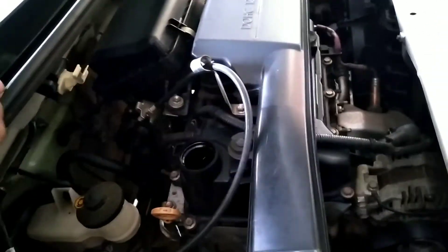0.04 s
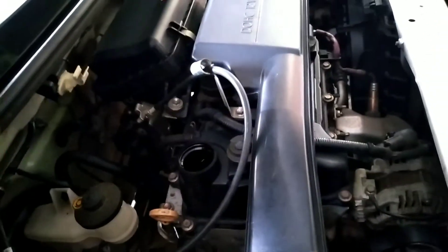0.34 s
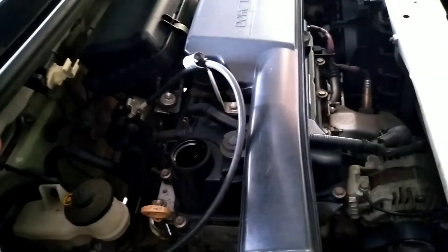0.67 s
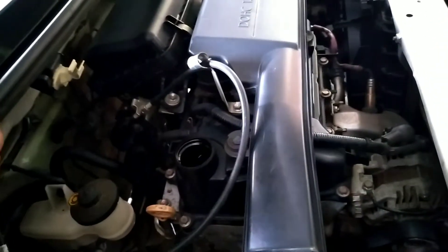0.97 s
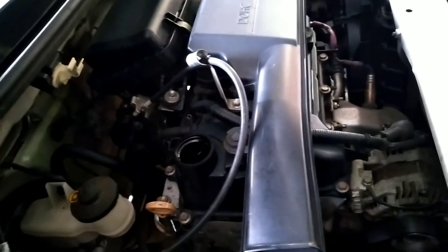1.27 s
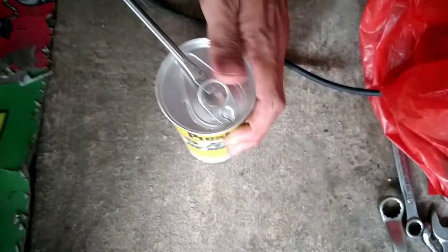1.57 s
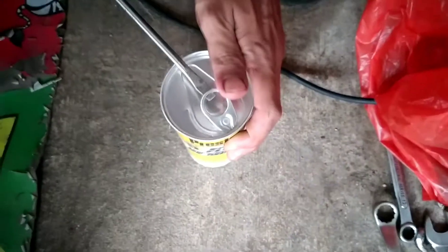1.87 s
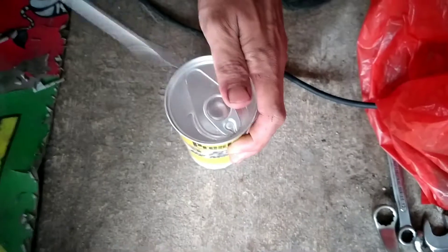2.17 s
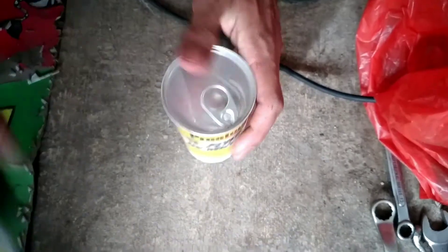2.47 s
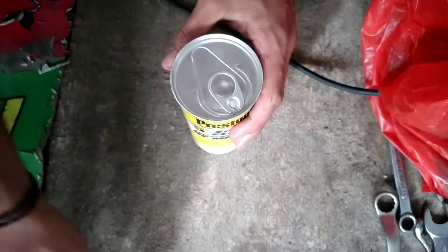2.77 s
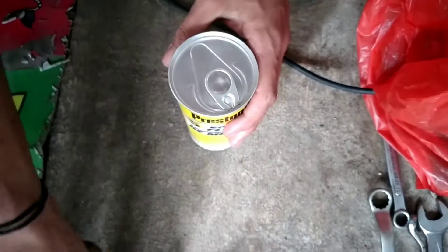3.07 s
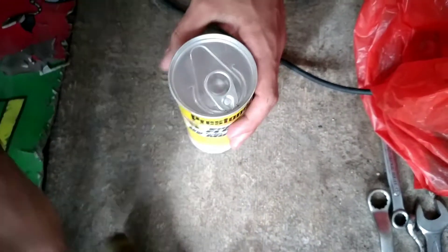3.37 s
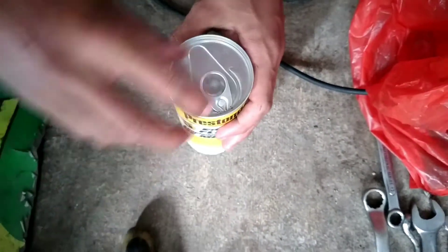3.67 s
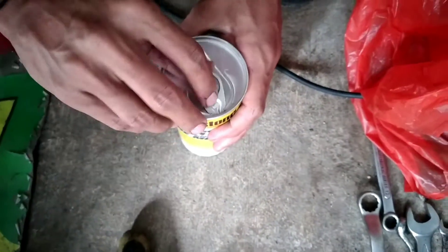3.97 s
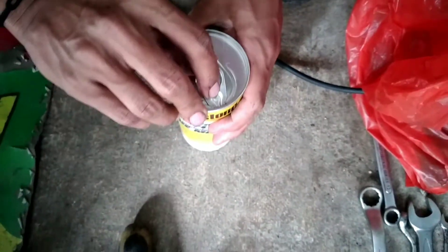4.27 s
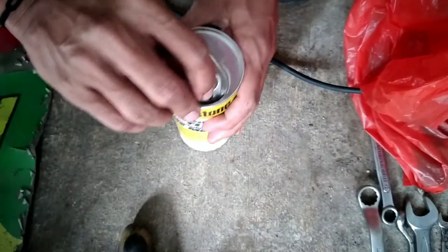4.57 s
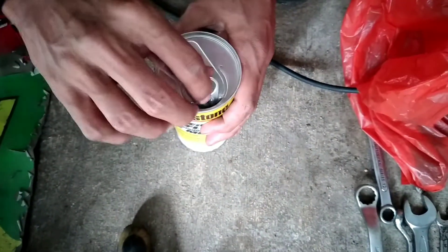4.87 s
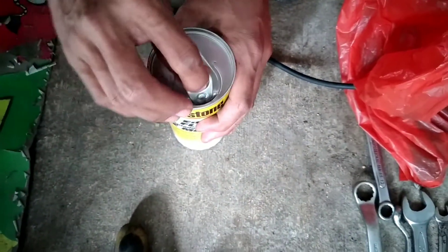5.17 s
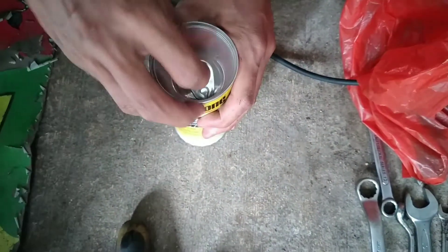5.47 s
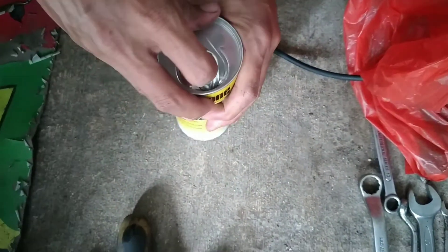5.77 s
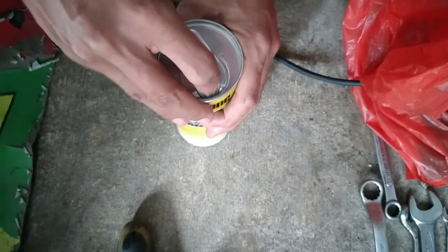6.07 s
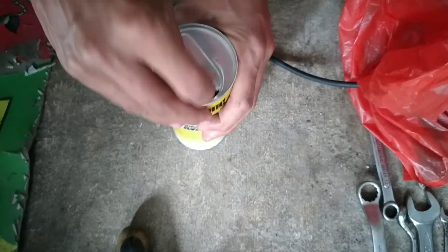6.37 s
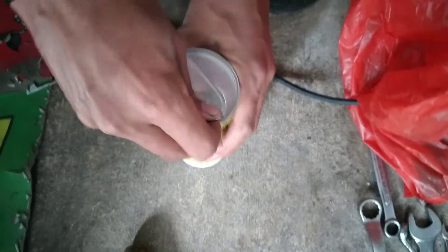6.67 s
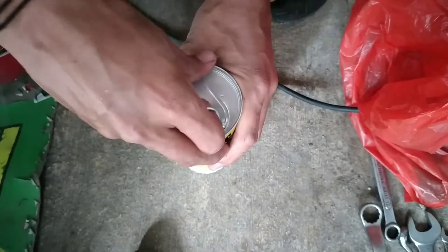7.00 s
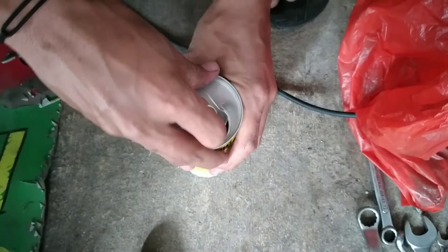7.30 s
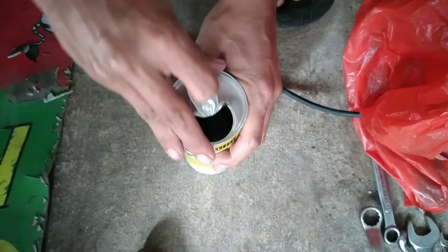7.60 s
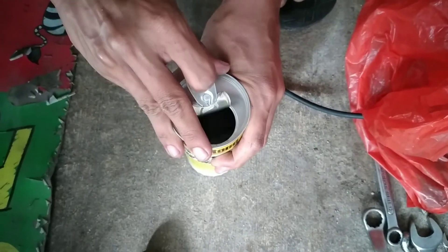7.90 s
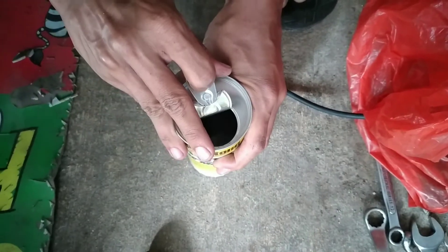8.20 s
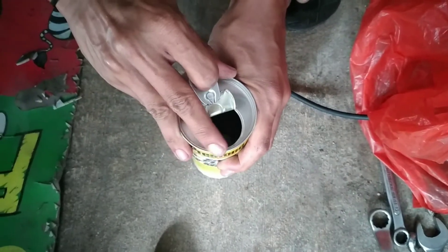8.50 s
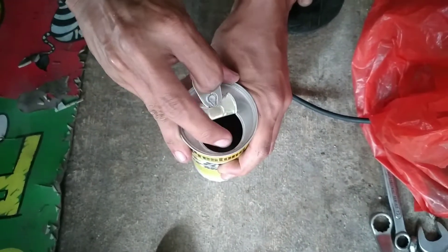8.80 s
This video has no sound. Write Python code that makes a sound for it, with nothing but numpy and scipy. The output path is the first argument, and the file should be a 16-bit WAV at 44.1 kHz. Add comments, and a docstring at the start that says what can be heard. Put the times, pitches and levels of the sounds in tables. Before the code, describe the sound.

After a few microphone knocks, a can pops, bumps on concrete and is opened with sharp metallic snaps in a garage.

```python
"""Opening a can on a garage floor

A ring-pull can, close to the stereo microphones of a hand-held camera. After a few handling knocks
the seal pops under a screwdriver, and the can bumps and scrapes on the concrete. Then the tab snaps
the lid in and the metal tears back. The garage rings briefly; from outside come a low rumble,
a far engine and faint high chirps."""
import sys
import numpy as np
from scipy import signal
from scipy.fft import rfft, irfft, next_fast_len
from scipy.io import wavfile

SR = 44100
rng = np.random.default_rng(int(sys.argv[2]) if len(sys.argv) > 2 else 0)


def file_out(sig):
    """Save sig as 16-bit WAV at sys.argv[1]."""
    # one column per channel
    cols = np.atleast_2d(sig).T
    # limit, then scale
    lim = np.clip(cols, -1, 1)
    pcm = np.round(lim * 32767).astype(np.int16)
    wavfile.write(sys.argv[1], SR, pcm)


N = 394596
T = np.arange(SR // 2) / SR  # time within one event, s

# Colour of the outdoor rumble and hiss, with two high microphone port resonances: freq_hz, relative_db
BACKGROUND_SPECTRUM = [(12, -24), (25, -2), (46, 3), (74, -10), (116, -6.5), (213, -14.5), (400, -16),
                       (520, -23), (930, -26), (1400, -33), (3200, -40.5), (5500, -40.5), (7600, -31.5),
                       (9300, -42.5), (11200, -36.5), (13000, -46), (15500, -48.5)]
# How alike the background is at the two microphones: freq_hz, correlation
BACKGROUND_LIKENESS = [(60, 0.93), (180, 0.93), (550, 0.27), (1650, -0.42), (4970, -0.02), (15000, -0.0)]
# Side the background leans to: freq_hz, left_over_right_db
BACKGROUND_BALANCE = [(60, 0), (150, 0), (380, -0.5), (950, 2.5), (2380, 1.5), (5980, 10), (15000, -11.5)]
# Course of the fine hiss: time_s, level_db
HISS_LEVELS = [(0, -61.5), (1.2, -64), (3.1, -61), (4.7, -65), (5.05, -61.5), (5.8, -64.5), (8.95, -63)]
# The deepest rumble steps up near 1.3 s, then stays nearly steady: time_s, gain_db
DEEP_GAINS = [(0, -8), (1.15, -7), (1.45, 4), (3.2, 0), (5.6, 1), (6.4, -1), (8.95, -2)]
# Third order of the far engine: time_s, pitch_hz, level_db
ENGINE_COURSE = [(0, 98.5, -69), (5.4, 95.88, -64.5), (5.9, 97.6, -55.5), (7.5, 96.9, -57.5),
                 (8.1, 101.9, -53.5), (8.95, 109.7, -56.5)]
# Distant high calls: start_s, middle_pitch_hz, glide_hz, level_db
FAR_CALLS = [(5.12, 5230, 650, -70.5), (5.26, 6300, -0.5, -67), (5.551, 7420, -50, -64),
             (5.84, 6310, -1000, -65.5), (6.04, 4970, -220, -71), (6.82, 4880, -700, -67),
             (7.18, 4220, -200, -74), (7.36, 6500, 0, -69), (7.86, 4754, -730, -68),
             (8.35, 5003, -200, -71)]

# Decay of the garage: freq_hz, t60_s
GARAGE_DECAY = [(100, .3), (550, .48), (1100, .5), (2500, .48), (7500, .47), (12000, .41), (16000, 0.23)]
# What the walls reflect: freq_hz, relative_db
WALL_SPECTRUM = [(100, -11.5), (500, -7), (1100, -1), (1700, -0.5), (3000, -1), (7500, -0.5), (11000, -4),
                 (16000, -5.5)]
# How alike close sounds are at the two microphones: freq_hz, correlation
CLOSE_LIKENESS = [(100, 0.92), (600, 1), (1100, 0.13), (2500, 0.38), (6000, 0.082), (16000, .05)]
# Side close sounds lean to at the microphone ports: freq_hz, left_over_right_db
PORT_BALANCE = [(100, 0), (1200, 1.5), (2500, 2.5), (4500, 4.5), (6300, 9), (8000, 12), (11000, -9),
                (16000, -1.5)]

# Knocks on the camera: start_s, level_db, tick_relative_db
CAMERA_KNOCKS = [(.136, -32.5, -5.5), (0.269, -52, -22), (.382, -32, -10.5), (0.5109, -33.5, 1),
                 (.585, -46, -18), (0.693, -52, -17), (.788, -33, -13), (1.0225, -36.5, -1.5)]
# Colour of a touch on the camera: freq_hz, relative_db
CAMERA_SPECTRUM = [(40, -17), (120, -24), (200, 0), (300, 2), (450, 0), (700, -14), (1200, -7.5),
                   (2000, -13), (3000, -18.5), (4500, -23.5), (7500, -21.5), (11000, -33.5), (16000, -52)]
# Modes of the camera body: pitch_hz, relative_db, t60_s
CAMERA_MODES = [(202, 1, 0.154), (252, -1, 0.2), (315.4, 2.5, 0.14), (937.3, -14.5, 0.071), (975, -2, .05),
                (1810, -5.5, 0.044), (2325, -19, 0.05), (2600, -16, 0.042)]
# Colour of a soft brush of cloth: freq_hz, relative_db
CLOTH_SPECTRUM = [(200, -7.5), (700, -0.5), (2000, -1.5), (4000, -8.5), (7500, -1), (11000, -8),
                  (16000, -19.5)]

# The can's base bumps the concrete: start_s, level_db, fade_s
FLOOR_BUMPS = [(2.687, -36, 0.018), (2.973, -39, .014), (3.377, -26.5, .0057), (3.404, -17, 0.0047),
               (3.4062, -25, 0.0083), (3.419, -30.5, .022)]
# Colour of a blow on the base: freq_hz, relative_db
BUMP_SPECTRUM = [(80, -41), (200, -32), (330, -11.5), (520, -8.5), (750, -9.5), (1100, -3), (1500, -12),
                 (2300, -15), (4500, -26), (7500, -13), (10000, -24.5), (16000, -40)]
# Modes of the full can: pitch_hz, relative_db, t60_s
FULL_CAN_MODES = [(300, -30, 0.089), (484.5, 4, 0.086), (592, -1.5, 0.24), (966, 9.5, 0.049),
                  (1224, -9.5, 0.034), (1915, -4, 0.16), (2900, -31, 0.14), (4160, -12, 0.11)]
# Grit scrapes under the base: start_s, level_db, fade_s, squeak_hz
FLOOR_SCRAPES = [(2.669, -30, 0.0049, 10900), (2.702, -25.5, 0.0055, 10800), (2.7119, -19, 0.0033, 11300),
                 (2.725, -31, 0.0073, 11300), (2.735, -45, .078, 6500), (2.9002, -23.5, 0.0032, 7320),
                 (2.972, -42, .028, 7500), (3.418, -27, 0.0096, 11300), (3.4318, -21.5, 0.006, 11300),
                 (3.445, -38, 0.026, 7550)]
# Colour of the grit: freq_hz, relative_db
GRIT_SPECTRUM = [(200, -3), (1000, -9), (3000, -7), (6000, -7), (9000, -15.5), (12000, -15), (16000, -33)]

# The seal bursts: start_s, level_db, fade_s
SEAL_BURSTS = [(1.5771, 1.5, 0.016), (1.59, -8.5, .019)]
# Colour of the escaping gas: freq_hz, relative_db
GAS_SPECTRUM = [(150, -17.5), (700, -18), (1050, -9.5), (1350, -3.5), (1620, -20), (2250, 1), (3000, -11.5),
                (3500, -3), (5000, -2.5), (7700, 6), (9300, -4.5), (11000, 2.5), (13000, -4), (16000, -11)]
# Colour of its turbulent thump: freq_hz, relative_db
THUMP_SPECTRUM = [(40, -14), (100, -7.5), (175, 1), (260, -4), (450, -8), (900, -13), (1250, -12),
                  (1620, -27), (3000, -32), (16000, -54)]
# Resonances of the can's wall and air space: pitch_hz, width_hz, level_db, fade_s
CAN_RESONANCES = [(1055, 50, -41, 0.056), (1297, 77, -28.5, 0.034), (2085, 35, -29.5, .05),
                  (2219, 50, -27.5, .05), (2315, 30, -29.5, 0.054), (2420, 27, -30.5, 0.032),
                  (3700, 460, -31.5, .035), (5000, 500, -29, .038), (5355, 23, -30.5, .045),
                  (6330, 25, -32, .045), (7200, 500, -22, .036), (8000, 700, -15, 0.03668),
                  (11130, 1200, -18.5, .033)]

# Fingers rub over the lid: start_s, length_s
FINGER_RUBS = [(3.72, 0.14), (3.871, 0.065), (4.959, 0.16), (5.279, 0.027), (6.141, .1), (6.755, .035),
               (8.902, .04)]
# Slips and snaps of tab and lid: start_s, level_db, fade_s, panel_relative_db
LID_SNAPS = [(1.538, -40, .008, -1.5), (1.556, -34, 0.018, -18), (1.999, -42.5, 0.032, -11),
             (2.025, -32.5, 0.0087, -14.5), (4.207, -46.5, .026, -25.5), (4.3121, -19, .0017, -9),
             (4.3141, -1.5, 0.0032, -2.5), (4.3172, -11, 0.0014, -21), (4.864, -50.5, 0.019, 0),
             (6.0, -49, 0.014, -6), (6.09, -52, 0.0052, 3), (6.646, -44.5, 0.0079, -13.5),
             (6.9391, -16.5, 0.0048, -14), (6.995, -33, 0.0081, -10), (7.0035, -28.5, .005, -8),
             (7.0523, -32.5, .0096, -14), (7.071, -37.5, 0.012, 6), (7.0897, -24, .004, -0.5),
             (7.112, -57.5, 0.015, 17.5), (7.355, -69.5, 0.019, 20.5), (8.846, -37.5, 0.006, -30)]
# Colour of slipping metal: freq_hz, relative_db
CRACK_SPECTRUM = [(100, -38), (400, -21), (650, -9.5), (850, -13.5), (1500, -10.5), (2400, -5.5),
                  (3300, -8.5), (3900, -7.5), (4700, -3.5), (7500, 5), (9500, -3.5), (11200, 2.5),
                  (13000, -4.5), (16000, -12)]
# Modes of the rim and tab: pitch_hz, relative_db, t60_s
RIM_MODES = [(2160, -14.5, .05), (3276, -12, .08), (5206, -7.5, 0.085), (6567, -1.5, 0.056),
             (6850, -3.5, 0.067), (7607, -3.5, .06), (7800, 0, .05), (8047, 4, 0.064), (7861, -6, .05),
             (9620, -9, 0.065), (10700, -1.5, 0.054), (11069, 0, 0.049), (12504, -9.5, .04)]
# Bending modes of the thin lid: pitch_hz, relative_db, t60_s
SHEET_MODES = [(574, -4.5, .15), (1150, 1, 0.1), (1420, -5.5, 0.03324), (1670, -1.5, .09), (1866, -5, 0.12),
               (2690, -6, 0.038), (2750, -10, 0.064), (3420, -3, 0.1), (4470, 0.5, 0.096)]


def amp(db):
    """Decibels to gain."""
    return 10 ** (np.asarray(db) / 20)


def unit(x):
    """Scales to rms 1."""
    return x / np.sqrt(np.mean(x ** 2) + 1e-20)


def read(points, hz):
    """Reads a (freq_hz, value) table on a log-frequency axis."""
    f, value = np.transpose(points)
    return np.interp(np.log(hz + 1), np.log(f + 1), value)


def add(mix, start_s, sound):
    """Mixes a stereo sound in at start_s."""
    part = mix[:, round(start_s * SR):][:, :sound.shape[1]]
    part += sound[:, :part.shape[1]]


def noise(spectrum, size=len(T), tilt_db=0, likeness=CLOSE_LIKENESS):
    """Stereo noise of rms 1 with a given colour, tilt per octave and left-right likeness."""
    hz = np.fft.rfftfreq(size, 1 / SR)
    left, other = rfft(rng.standard_normal((2, size)))
    shared = np.clip(read(likeness, hz), -1, 1)
    right = shared * left + np.sqrt(1 - shared ** 2) * other
    colour = amp(read(spectrum, hz) + tilt_db * np.log2(hz + 1))
    return unit(irfft(np.array([left, right]) * colour, size))


def band(hz, width_hz):
    """Noise in one resonance."""
    f = np.geomspace(hz / 4, hz * 4, num=301)
    return noise(np.c_[f, -20 * np.log10(1 + (2 * (f - hz) / width_hz) ** 2)])


def grainy(size=len(T), grain_s=0.00025, depth_db=4):
    """The uneven loudness of many small slips."""
    knots = np.arange(0, size / SR + grain_s, grain_s)
    flicker = rng.standard_normal(len(T))[:len(knots)]
    return amp(depth_db * np.interp(np.arange(size) / SR, knots, flicker))


def burst(x, fade_s, rise=.08):
    """A quick rise (a fraction of fade_s) and an exponential fall, with that envelope's energy."""
    envelope = np.exp(-T / fade_s) * (1 - np.exp(-T / (rise * fade_s)))
    return unit(x * envelope) * np.sqrt(np.mean(envelope ** 2))


def ring(modes, spread=.002):
    """Dying sines, slightly detuned, that reach the two microphones in different phases."""
    hz, db, t60 = np.transpose(modes)[:, :, None]
    hz = hz * (1 + spread * rng.standard_normal(hz.shape))
    waves = amp(db - 60 * T / t60) * np.exp(2j * np.pi * hz * T) / np.linalg.norm(amp(db))
    left, apart = rng.uniform(-np.pi, np.pi, (2, len(hz)))
    phases = np.array([left, left + apart * (1 - read(CLOSE_LIKENESS, hz[:, 0]))])
    return np.sqrt(2) * (np.exp(1j * phases) @ waves).imag


def lean(x, balance):
    """Tips each frequency to the left or right."""
    size = 2 * next_fast_len(N)
    db = read(balance, np.fft.rfftfreq(size, 1 / SR))
    gains = amp(np.array([db, -db]) / 2)
    return irfft(rfft(x, size) * gains / np.sqrt(np.mean(gains ** 2, 0)))[:, :N]


def cut(x, order, hz, kind):
    """A low-pass or high-pass filter."""
    return signal.sosfilt(signal.butter(order, hz, kind, fs=SR, output="sos"), x)


def background(split_hz=1500, deep_hz=65, rumble_db=-52):
    """Outdoor rumble, its deepest bass stepping up early on, and hiss coloured by the microphone ports."""
    t = np.arange(N) / SR
    bed = noise(BACKGROUND_SPECTRUM, next_fast_len(N), likeness=BACKGROUND_LIKENESS)[:, :N]
    low = unit(cut(bed, 3, split_hz, "low"))
    deep = signal.sosfiltfilt(signal.butter(3, deep_hz, fs=SR, output="sos"), low, padtype=None)
    rumble = low - deep + amp(np.interp(t, *np.transpose(DEEP_GAINS))) * deep
    hiss = amp(np.interp(t, *np.transpose(HISS_LEVELS))) * unit(cut(bed, 3, split_hz, "high"))
    return lean(amp(rumble_db) * rumble + hiss, BACKGROUND_BALANCE)


def far_engine(fourth_db=-1, waver=0.085):
    """A far engine hums on its third and fourth orders, wavering in pitch."""
    t = np.arange(N) / SR
    time_s, hz, db = np.transpose(ENGINE_COURSE)
    drift = np.interp(t, np.linspace(0, t[-1], num=90), rng.standard_normal(90))
    phase = 2 * np.pi * np.cumsum(np.interp(t, time_s, hz) * (1 + waver * drift)) / SR
    return amp(np.interp(t, time_s, db)) * (np.sin(phase) + amp(fourth_db) * np.sin(phase * 4 / 3))


def far_chirps(length_s=.27, blur_hz=380):
    """High gliding calls, blurred and drawn out by distance."""
    out, size = np.zeros((2, N)), round(length_s * SR)
    progress = np.linspace(0, 1, size)
    for start_s, hz, glide_hz, db in FAR_CALLS:
        blur = cut(rng.standard_normal((2, SR)), 2, blur_hz, "low")[:, :size]
        glide = np.sin(2 * np.pi * np.cumsum(hz + (progress - .5) * glide_hz) / SR)
        add(out, start_s, amp(db) * unit(blur * glide * np.sqrt(progress) * (1 - progress)))
    return out


def garage(x, early_db, early_s, tail_db, gap_s, echoes_per_s=5000):
    """Quick reflections from floor and car, then a tail that dies band by band."""
    age_s = np.arange(SR) / SR - gap_s
    signs = rng.choice([-1., 1.], (2, SR))
    echoes = signs * (rng.random((2, SR)) < echoes_per_s / SR) * (age_s > 0)
    early = echoes * np.exp(-abs(age_s) / early_s)
    hz, t, bands = signal.stft(echoes, SR, nperseg=256)
    decay = amp(read(WALL_SPECTRUM, hz)[:, None] - 60 * t / read(GARAGE_DECAY, hz)[:, None])
    tail = signal.istft(bands * decay, SR)[1][:, :SR]
    response = (amp(early_db) * unit(early) + amp(tail_db) * unit(tail)) / np.sqrt(SR)
    return signal.fftconvolve(x, response, axes=1)[:, :N]


def camera_tap(fade_s, tilt_db, ring_db):
    """One touch on the camera body and its short ring."""
    touch = noise(CAMERA_SPECTRUM, tilt_db=tilt_db, likeness=[(100, 0.62), (12000, 0.3)])
    touch *= grainy(grain_s=0.0024, depth_db=3)
    return burst(touch, fade_s) + amp(ring_db) * ring(CAMERA_MODES, spread=0.028)


def handling(left_lag_s=.00032, cloth_s=1.122, cloth_db=-42):
    """Each knock on the camera clicks a loose part, then the grip settles; last, cloth brushes by."""
    out = np.zeros((2, N))
    for start_s, db, tick_db in CAMERA_KNOCKS:
        knock = camera_tap(fade_s=0.0071, tilt_db=1.5, ring_db=-3)
        tick = camera_tap(fade_s=0.002, tilt_db=11.5, ring_db=0)
        settle = camera_tap(fade_s=0.032, tilt_db=-1.5, ring_db=-1)
        add(out, start_s, amp(db) * knock)
        add(out, start_s + .0062, amp(db + tick_db) * tick)
        add(out, start_s + .032, amp(db - 13) * settle)
    out[0] = np.roll(out[0], round(left_lag_s * SR))
    add(out, cloth_s, amp(cloth_db) * burst(noise(CLOTH_SPECTRUM), fade_s=.065, rise=0.055))
    return out


def bump(fade_s, tilt_db, ring_db=-7):
    """One blow on the base of the full can; bright glancing blows ring the body less."""
    body = amp(ring_db - 1.28 * max(tilt_db, 0)) * ring(FULL_CAN_MODES, spread=0.012)
    return burst(noise(BUMP_SPECTRUM, tilt_db=tilt_db), fade_s) + body


def can_bumps(rock_start_s=3.477, rock_every_s=0.033, rock_db=-31.5, loss_db=5):
    """The full can bumps dully on the concrete, then rocks to rest, each time more softly."""
    out = np.zeros((2, N))
    for start_s, db, fade_s in FLOOR_BUMPS:
        add(out, start_s, amp(db) * bump(fade_s, tilt_db=-2))
    for k in range(3):
        rock = amp(rock_db - k * loss_db) * bump(fade_s=0.011, tilt_db=-5)
        add(out, rock_start_s + k * rock_every_s, rock)
    return out


def can_scrapes(grip_db=-28.5):
    """The rim glances over grit, squeaking more the harder it is pressed beyond the grip level."""
    out = np.zeros((2, N))
    for start_s, db, fade_s, squeak_hz in FLOOR_SCRAPES:
        grit = noise(GRIT_SPECTRUM) * grainy(grain_s=0.00055, depth_db=4)
        squeak = amp(-3 + 2.5 * max(db - grip_db, 0)) * band(squeak_hz, width_hz=570)
        glance = amp(-5) * bump(fade_s, tilt_db=10, ring_db=-1.5)
        add(out, start_s, amp(db) * (burst(grit + squeak, fade_s, rise=0.17) + glance))
    return out


def fingers(level_db=-62.5):
    """Skin and nails slide unevenly over the metal."""
    out = np.zeros((2, N))
    for start_s, length_s in FINGER_RUBS:
        size = round(length_s * SR)
        rub = noise(CRACK_SPECTRUM)[:, :size] * grainy(size, grain_s=0.003, depth_db=3.5)
        add(out, start_s, amp(level_db) * unit(rub * signal.windows.hann(size)))
    return out


def gas_puff(push_db=-3, swell_s=.012, flow_s=.04, leak_s=.06):
    """The released gas pushes on both microphones; their vents leak it away with a slow undershoot."""
    age_s = np.maximum(np.arange(N) / SR - SEAL_BURSTS[0][0], 0)
    push = (1 - np.exp(-(age_s / swell_s) ** 2)) * np.exp(-age_s / flow_s)
    return amp(push_db) * signal.lfilter([1, -1], [1, -np.exp(-1 / (leak_s * SR))], push)


def seal_pop(thump_db=-12, thump_s=0.012):
    """Gas spits through the broken seal with a turbulent thump, and the whole can rings."""
    out, pop_s = np.zeros((2, N)), SEAL_BURSTS[0][0]
    for start_s, db, fade_s in SEAL_BURSTS:
        spit = noise(GAS_SPECTRUM) * grainy(depth_db=3.5)
        add(out, start_s, amp(db) * burst(spit, fade_s, rise=0.022))
    gust = noise(THUMP_SPECTRUM, likeness=[(40, 0.44), (150, 0.76), (600, .4)])
    add(out, pop_s, amp(thump_db) * burst(gust, thump_s, rise=0.17))
    for hz, width_hz, db, fade_s in CAN_RESONANCES:
        add(out, pop_s, amp(db) * burst(band(hz, width_hz), fade_s))
    return out


def lid_tear(start_s=6.95, end_s=7.125, level_db=-53, slips_per_s=250, slip_fade_s=0.0011):
    """Small slips run along the score line while the lid peels back."""
    out, size = np.zeros((2, N)), round((end_s - start_s) * SR)
    slips = rng.uniform(0.37, 1, size) * (rng.random(size) < slips_per_s / SR)
    grain = signal.lfilter([1], [1, -np.exp(-1 / (slip_fade_s * SR))], slips)
    crackle = unit(noise(CRACK_SPECTRUM, size) * grain)
    add(out, start_s, amp(level_db) * crackle * signal.windows.tukey(size, .2))
    return out


def panel_pitch(time_s, excess_db, shut_hz=1232.7, free_hz=871, free_s=7.08):
    """The panel sounds lower when buckled hard, and lower still once the flap has torn free."""
    sag_hz = np.clip(12 * excess_db, 0, 160)
    return free_hz if time_s > free_s else shut_hz - sag_hz


def lid_snaps(hard_db=-22):
    """Each slip of the metal is a crack, a hollow flex of the panel, and a ring of rim and lid."""
    out = np.zeros((2, N))
    for start_s, db, fade_s, panel_db in LID_SNAPS:
        crack = burst(noise(CRACK_SPECTRUM) * grainy(depth_db=1), fade_s)
        panel_hz = panel_pitch(start_s, db - hard_db)
        flex = band(panel_hz, width_hz=500) + np.sin(2 * np.pi * panel_hz * T)
        panel = amp(panel_db) * burst(flex, fade_s + 0.00035, rise=.2)
        rim = amp(-6.5 if db > hard_db else -7.5) * ring(RIM_MODES)
        sheet_db = min(-30 - 0.53 * db, -15)  # the pressing finger damps the lid in hard snaps
        sheet = amp(sheet_db) * ring(SHEET_MODES)
        add(out, start_s, amp(db) * (crack + panel + rim + sheet))
    return out


def scene():
    """The lid faces the microphones and sounds dry; can body and knocks carry more of the garage."""
    lid = lid_snaps() + lid_tear() + fingers()
    lid = cut(lid, order=4, hz=520, kind="high")  # the lid's sounds carry no deep bass
    body = seal_pop() + can_bumps() + can_scrapes() + handling()
    lid_room = garage(lid, early_db=-14, early_s=.018, tail_db=-25, gap_s=.009)
    body_room = garage(body, early_db=-13, early_s=.016, tail_db=-17, gap_s=.004)
    indoors = lean(lid + body + lid_room + body_room, PORT_BALANCE) + gas_puff()
    return indoors + far_chirps() + background() + far_engine()


def record(dry, edge_hz=15800):
    """The loudest peaks overload the recorder, and its band limit takes off the highest treble."""
    clipped = np.clip(dry, -1, 1)
    band_limit = signal.firwin(511, edge_hz, window=("kaiser", 9), fs=SR)
    return signal.oaconvolve(clipped, band_limit[None], "same", axes=1)


dry = scene()
out = record(dry)
file_out(out)
```